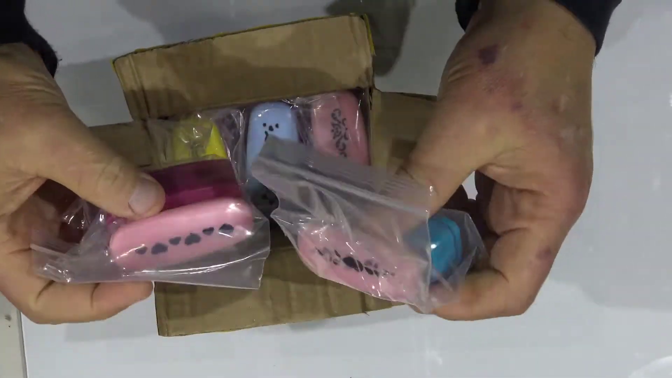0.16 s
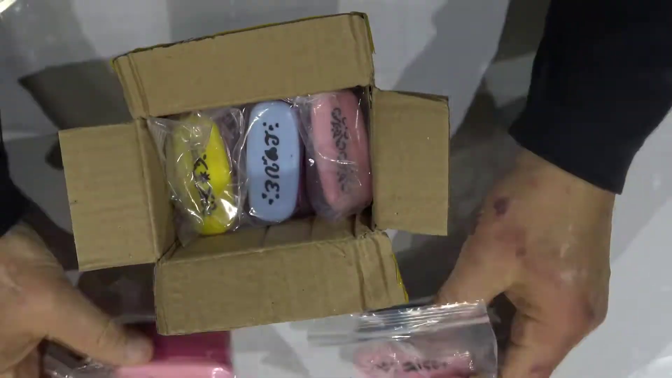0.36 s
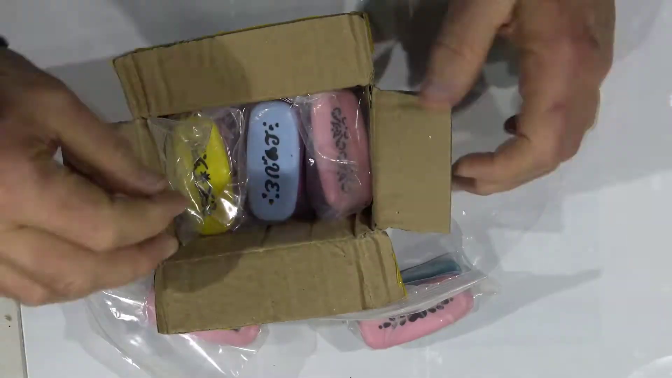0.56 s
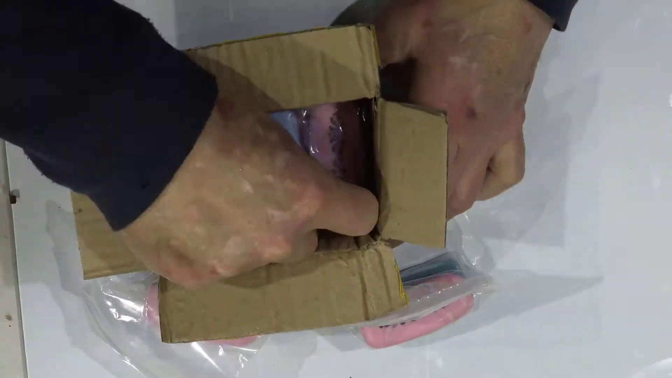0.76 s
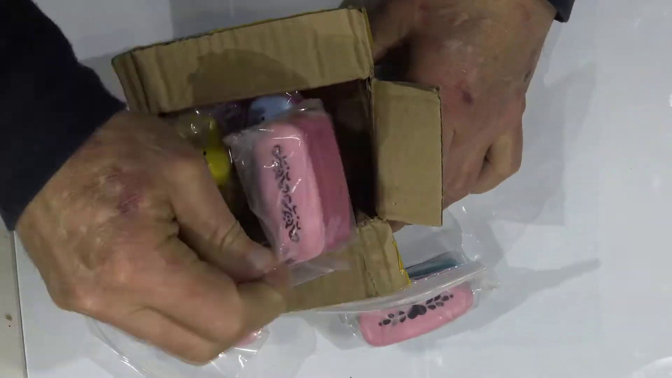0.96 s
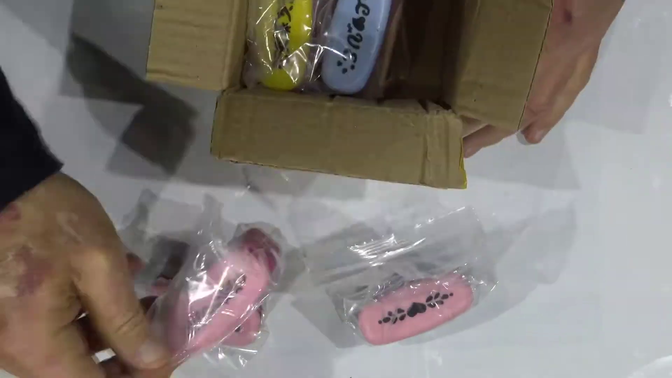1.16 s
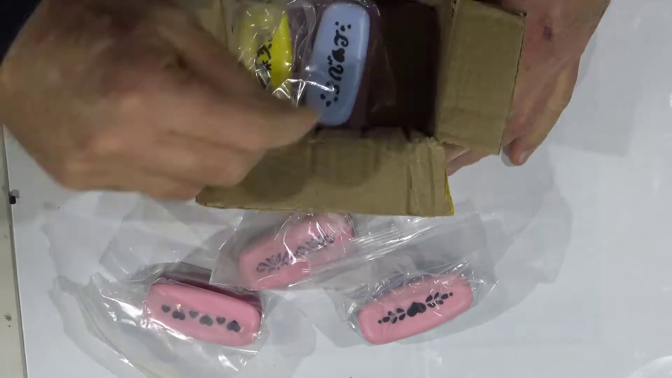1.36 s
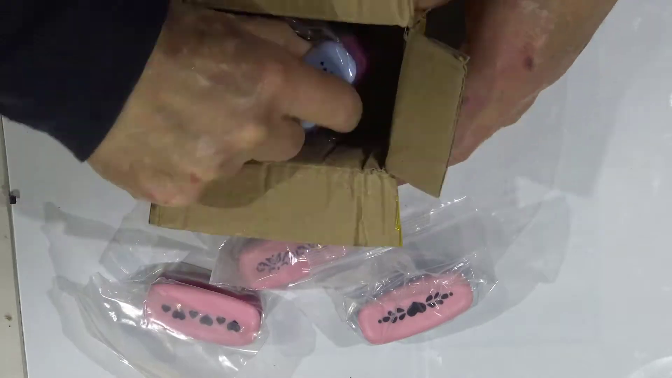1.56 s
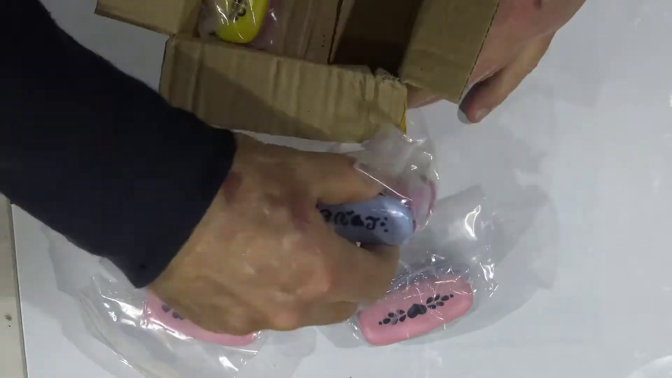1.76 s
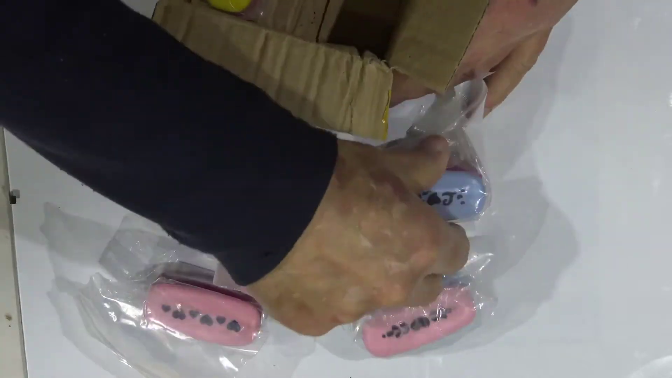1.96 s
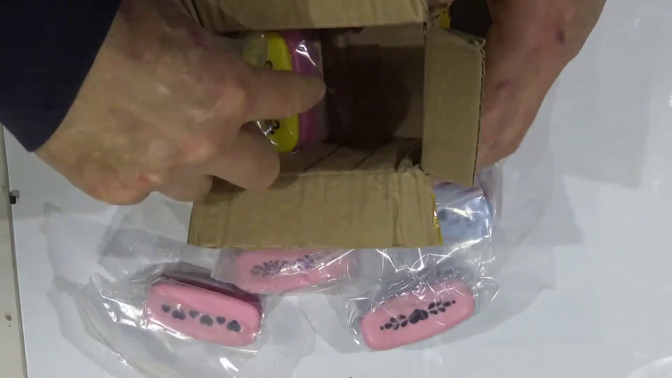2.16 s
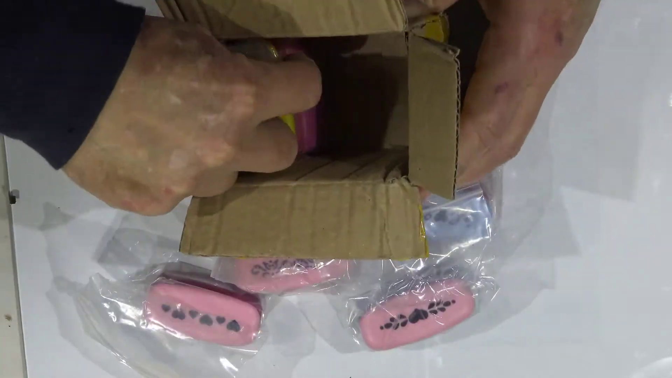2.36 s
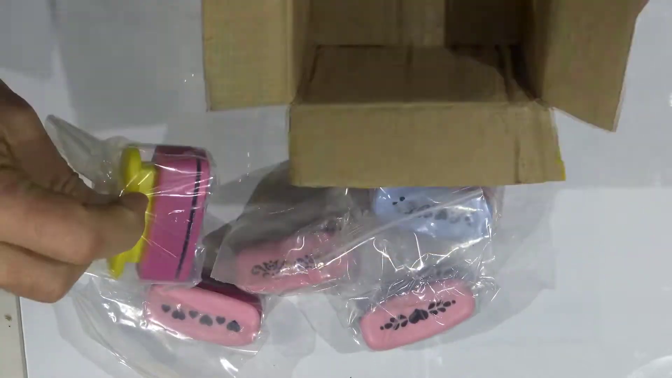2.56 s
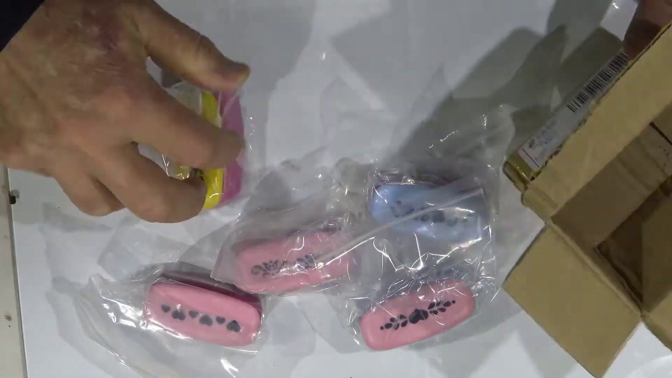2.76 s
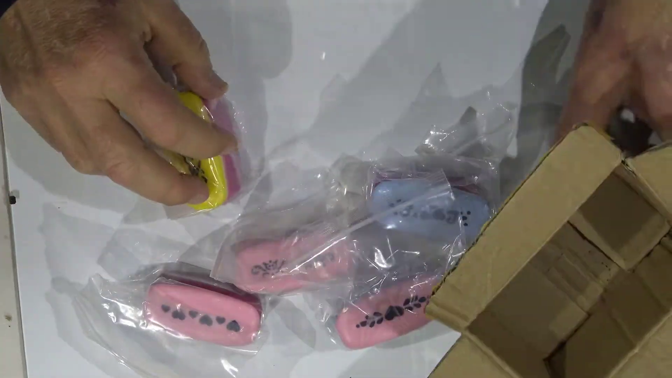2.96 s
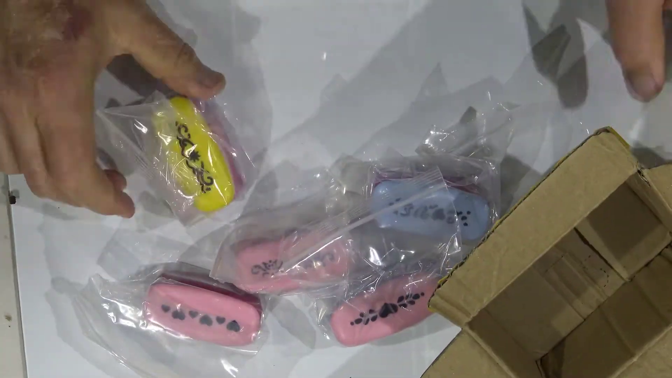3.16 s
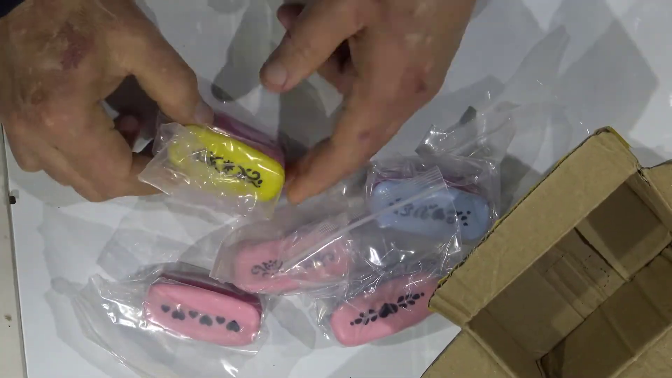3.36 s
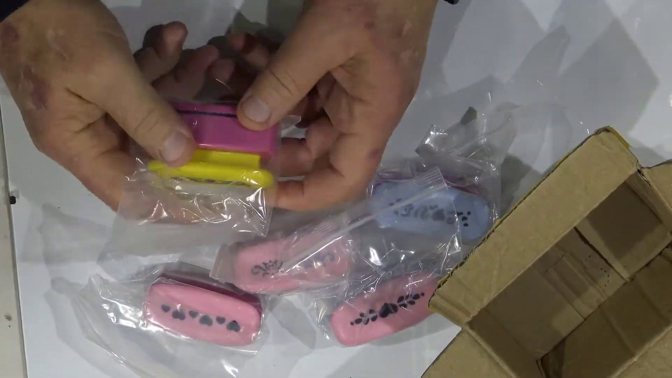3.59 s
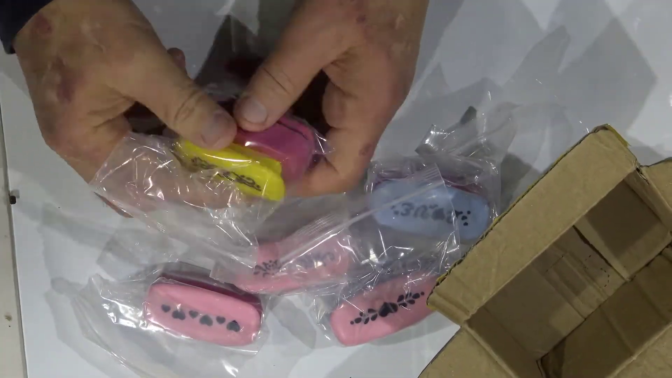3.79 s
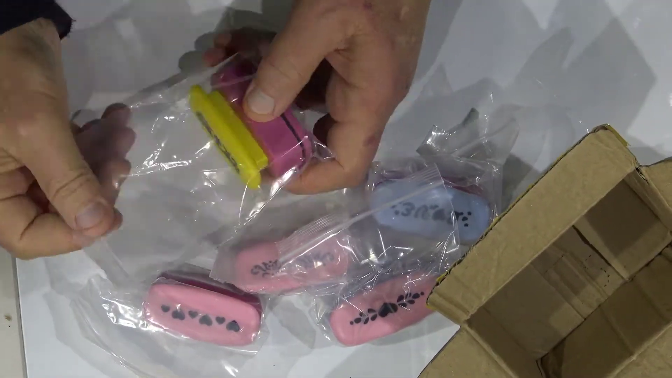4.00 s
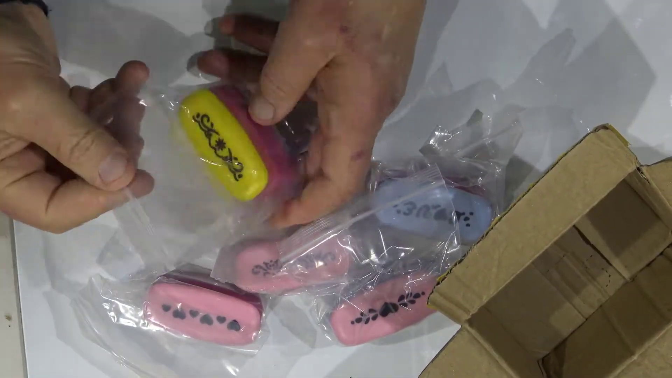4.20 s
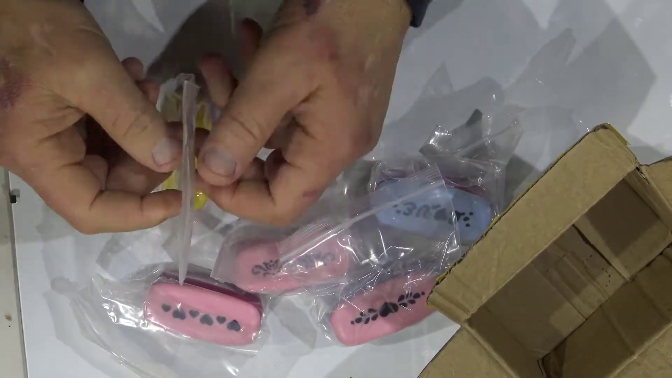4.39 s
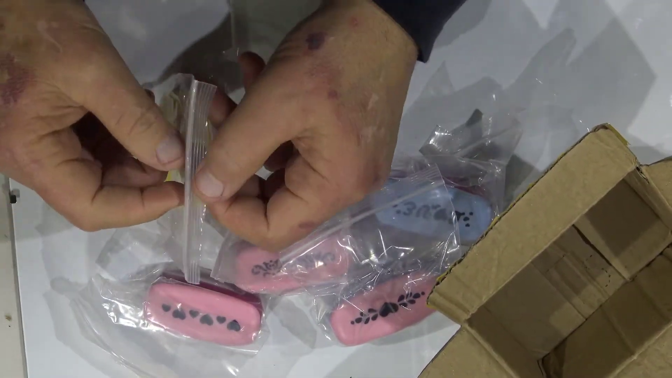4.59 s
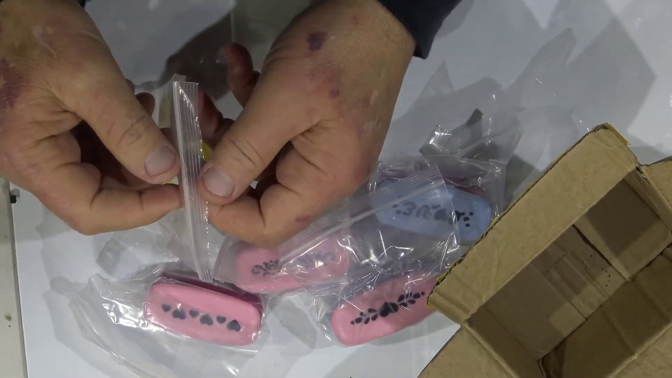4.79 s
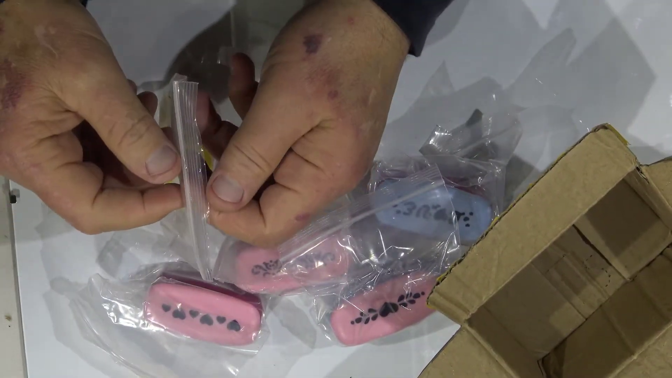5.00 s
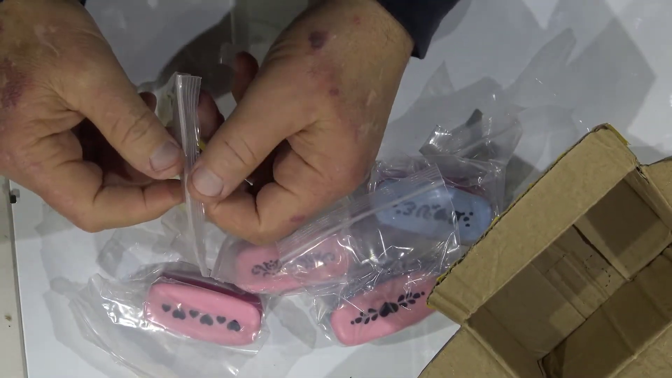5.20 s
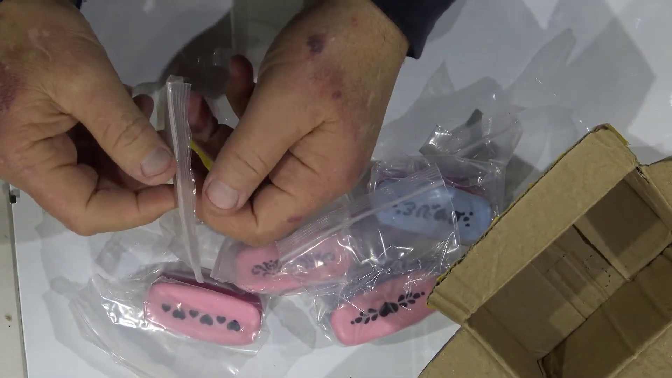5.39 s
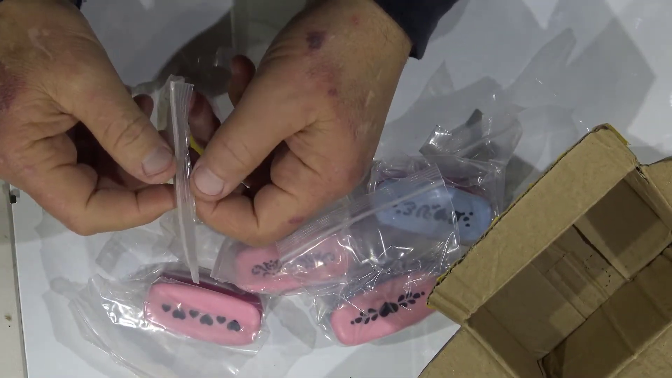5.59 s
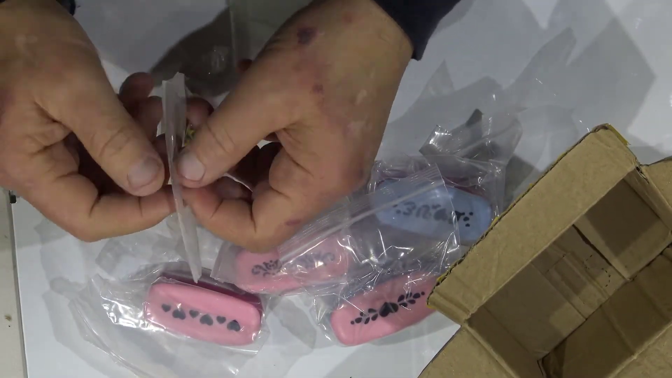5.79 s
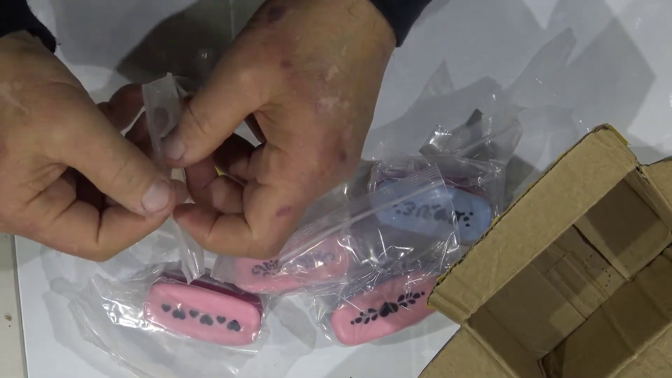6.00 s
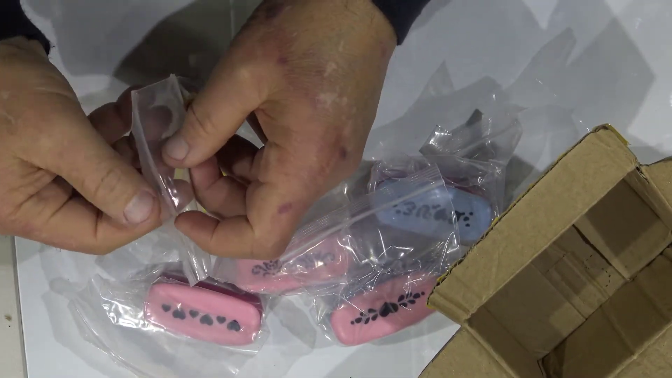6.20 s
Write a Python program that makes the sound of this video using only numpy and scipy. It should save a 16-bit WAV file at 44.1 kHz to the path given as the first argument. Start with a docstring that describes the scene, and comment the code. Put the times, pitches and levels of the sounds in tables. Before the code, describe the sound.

Thin plastic bags crinkle as small cases knock onto a table and a cardboard box bumps, then a zip seal ticks softly.

```python
"""Bagged plastic cases unpacked from a box

Thin film rustles (random crease pulses over noise) and snaps (pitched pulses with a shiver of noise) in the hands.
Cases and cardboard box knock on a table (struck modes, dense noise, a thud); taut plastic pops (ringing modes).
Then fingers work at a zip seal: clusters of ticks, each with a click.
Behind lie a faint hiss, a wavering whine and a twice-swelling tone (filtered noise, sines); a short room tail."""
import sys
import numpy as np
from scipy import signal
from scipy.fft import rfft, irfft
from scipy.io import wavfile
from scipy.ndimage import uniform_filter1d

SR = 44100
rng = np.random.default_rng(int(sys.argv[2]) if len(sys.argv) > 2 else 0)


def wav_out(sig):
    """Save sig, one row per channel (or a flat mono array), as 16-bit PCM at SR to the path in sys.argv[1]."""
    wavfile.write(sys.argv[1], SR, np.round(np.clip(np.atleast_2d(sig).T, -1, 1) * 32767).astype(np.int16))


N = 275609
MS = SR // 1000  # samples per millisecond

# "1 ms energy": rms level of the transient if squeezed into 1 ms; all source levels are ahead of the room
# room hiss contour: f/Hz, relative density/dB
HISS_CONTOUR = [(25, -18), (100, -10), (250, -4), (520, -1.5), (720, 1.5), (1500, -2), (2700, -4),
                (4500, -5), (6800, -10), (8500, -8.5), (15500, -12.5)]
# broad resonances in the hiss: f/Hz, width/Hz, gain/dB
HISS_RESONANCES = [(508.6, 15.6, 12.6), (1020, 310, 1.9), (1974, 320, 5.4), (3440, 470, 12.3),
                   (5680, 240, 11.7), (6250, 120, 13.4), (6800, 450, 10.5)]
# whine, ahead of the channel balance: f/Hz, rms level/dB
WHINE_TONES = [(357, -72.5), (452, -72.5), (527.6, -70), (644, -71.5), (888.2, -62.5), (1797, -70),
               (3525, -65.5), (6417, -76), (7074, -66.5)]
# pulls, turns and drops of a bag: start t/s, length/s, level at 2.5-8 kHz ahead of the crackle trim/dB,
# swell start to end/dB, body relative to level/dB, air relative to level/dB
BAG_STROKES = [(0, .11, -46, -2.5, -3.5, 3.5), (.218, .052, -39, -6, -6.5, 3.5),
               (0.35, .15, -43, -1, -1, 2.5), (0.412, .028, -34, 3, -13, 3.5),
               (0.587, .025, -37, -3, -9.5, -2), (0.689, .068, -33, 8, -11, -2),
               (0.771, .055, -43, 0, -8, 7), (.829, .055, -33, -8, -10.5, -0.5),
               (0.907, .075, -31, -9, -8.5, 0.5), (1.06, .06, -49, 2, -9.5, 0.5),
               (1.286, .022, -35, -3, -9.5, -0.5), (1.445, .08, -35, -2, -9.5, 2),
               (1.523, .105, -28.5, 11, -9, 2.5), (1.723, .145, -35, 2, -4.5, 3),
               (1.929, .095, -39, -2, -1.5, 1.5), (2.084, .035, -45, -4.5, -4, 6),
               (2.16, .04, -47, 4, -7, 5), (2.206, .075, -36, -5, -9, 5), (2.309, .02, -38, -8, -5, 4),
               (2.368, .09, -36, -1, -8, 2.5), (2.46, .13, -46, 0, -7, -2), (2.715, .065, -40, -2, -9, 3),
               (2.82, .018, -44, 0, -15, 7), (2.913, .04, -41, -4, -8, 1), (3.047, .03, -49, 0, 0, 7),
               (3.224, .047, -36, 0, -11.5, 2.5), (3.329, .033, -40, -1, -9, -7),
               (3.386, .06, -49, 2, -9, 11), (3.453, .023, -32, -1, -14, 6.5),
               (3.544, .155, -36, 3, -8, 4.5), (3.782, .075, -44, 4, -7.5, 7),
               (3.868, .04, -24, 3, -10.5, 3.5), (3.955, .062, -33.5, 12, -6, 4),
               (4.071, .095, -38, 1, -3.5, 0), (4.22, .125, -44.5, 5, -4, 3)]
# big creases snapping through: t/s, 1 ms energy ahead of the snap trim/dB, f/Hz, spread (floored later)/octaves
BIG_CREASES = [(.029, -25.5, 8100, 1.1), (.095, -24.5, 4650, 0.29), (0.216, -20.5, 11040, 0.71),
               (0.2416, -25, 8720, 0.53), (.268, -24.5, 7400, 0.97), (.3519, -29, 5670, 0.28),
               (0.3638, -18.5, 9100, 0.31), (0.3862, -22.5, 11820, .4), (0.4839, -25.5, 5670, 1.5),
               (0.6942, -24.5, 3640, .3), (0.8301, -19.5, 6860, 0.24), (0.8638, -22, 5700, .9),
               (0.91, -21.5, 7060, 0.17), (1.2888, -26, 6230, 0.35), (1.3851, -31.5, 3630, 0.41),
               (1.444, -19, 4455, 0.56), (1.4632, -20.5, 6406, 1.4), (1.4963, -16.5, 12100, .55),
               (1.526, -20, 4510, 1.2), (1.5938, -14.5, 5054, .2), (1.7255, -19, 11000, 0.55),
               (1.7683, -18.5, 7724, 0.43), (1.806, -19, 5227, 0.48), (1.8249, -16.5, 7900, 1.5),
               (1.9923, -22.5, 5600, .7), (2.206, -16.5, 7760, 0.83), (2.2669, -23, 9310, 0.59),
               (2.3081, -19.5, 6530, 1.6), (2.3704, -21, 12200, .8), (2.4156, -16.5, 7750, 1.23),
               (2.549, -21.5, 4200, 0.97), (2.5807, -20, 3090, 1.73), (2.6597, -21.5, 11500, 0.48),
               (2.833, -25, 10500, 0.83), (2.914, -14, 2021, 0.89), (3.0145, -32.5, 4270, 0.47),
               (3.0487, -23.5, 8900, .35), (3.1232, -25.5, 5210, 0.59), (3.256, -19.5, 9100, 1.1),
               (3.3302, -26.5, 5300, 0.36), (3.4349, -23.5, 11150, 0.99), (3.4674, -16.5, 11300, 0.66),
               (3.5203, -19.5, 8520, 0.33), (3.5514, -22.5, 6850, 1.1), (3.582, -17.5, 8000, 1.17),
               (3.6066, -17.5, 8796, 0.68), (3.628, -20.5, 12800, 0.57), (3.6638, -18, 10500, 1),
               (3.6923, -22, 8500, .7), (3.782, -22, 10600, 1.2), (3.8104, -27, 7700, .75),
               (3.847, -19.5, 7295, 0.69), (3.899, -16.5, 6450, 0.29), (3.9584, -22.5, 8190, 0.18),
               (3.9761, -26, 8095, 0.65), (4.1223, -17.5, 8300, 0.28), (4.156, -23, 7870, 1.09),
               (4.2196, -29.5, 5600, 0.65), (4.2842, -27.5, 5290, 0.8)]
# cases set on the table: t/s, body 1 ms energy/dB, then relative to body: bass/dB, clack/dB, crack/dB, thud/dB
CASE_HITS = [(.4237, -11, -9.5, 1, -10, -31), (.4623, -21, -21, -7, -20, -30),
             (1.3045, -33, 3, -22, -3, -13), (1.807, -23.5, -17, -13, 3, -25),
             (1.826, -26, -18, -24, -4, -36), (1.9578, -11, -24, -11, -5.5, -37),
             (2.714, -12, -19, -3, -7, -26), (2.776, -24.5, -20, -17, -16, -33),
             (3.307, -29, -17, -6, -19, -19), (3.348, -19.5, -27, -2.5, -4, -32)]
# cardboard box bumped and put aside: t/s, body 1 ms energy/dB, then bass/dB, clack/dB, crack/dB, thud/dB
BOX_HITS = [(.692, -27.5, -15, -21, -7, -20), (.714, -25.5, -8.5, -8, 5, -21),
            (1.444, -29.5, -23, -3, 1, -32), (2.548, -27, -19.5, 1.5, -8, -26),
            (2.581, -33.5, -34, 3, -6, -30), (2.9098, -25, -0.5, -15, 6.5, -31),
            (2.9132, -19, -4, 0, -21, -16), (2.929, -22.5, -17, -7, -2, -30)]
# bass, body, clack, crack of a knock: low f/Hz, high f/Hz
KNOCK_BANDS_HZ = [(220, 480), (480, 1500), (1500, 2700), (2500, 16000)]
# ringing of a case on the table top, nominal: f/Hz, relative level/dB, t60/s
CASE_RING = [(242, -1, 0.075), (357, 0.5, 0.053), (446, -8, 0.097), (658.5, -4.5, 0.11),
             (720, -15.5, 0.032), (727, 6, 0.023), (805, -4.5, 0.08), (975, 3, 0.063), (1130, -9, 0.13),
             (1294, -1.5, 0.085), (1380, -12, 0.11), (1500, -4.5, 0.039), (1978, 4, 0.054),
             (2060, -9, 0.13), (2300, 2, 0.075), (2490, 3, 0.047)]
# ringing of the hollow box, nominal: f/Hz, relative level/dB, t60/s
BOX_RING = [(205, -2, 0.04), (262, -14, 0.056), (340, -8, 0.056), (653, -4.5, 0.091), (715, -15, 0.042),
            (966, -25, 0.049), (1059, 4.5, 0.057), (1190, 5, 0.031), (1590, -1, 0.035), (1843, -17, 0.11),
            (2304, 2, 0.097), (2700, -24, 0.1)]
# pops of taut plastic: t/s, 1 ms energy/dB
PLASTIC_POPS = [(0.585, -36), (0.602, -14)]
# ringing of a pop, nominal: f/Hz, relative level/dB, t60/s
POP_RING = [(3290, 5, 0.016), (3310, 0, 0.016), (2900, -6, 0.02), (3520, -5, 0.014), (6840, 8, 0.011),
            (7520, 2, 0.013), (8200, -1, 0.019), (8900, -4, 0.02), (13400, -12, 0.0048)]
# squeezes of the zip seal: peak t/s, tick level ahead of the crackle trim/dB, 1/e time each side/s,
# click 1 ms energy ahead of the snap trim/dB, click f/Hz
SEAL_SQUEEZES = [(4.435, -56, 0.0087, -35.5, 5550), (4.6166, -47, 0.0062, -28.5, 9400),
                 (4.707, -41.5, .014, -31, 7060), (5.107, -40, .011, -24, 10400),
                 (5.203, -51, .005, -41, 9000), (5.2458, -47.5, 0.0086, -32.5, 6200),
                 (5.368, -49, .008, -49, 7000), (5.4626, -44.5, 0.0058, -28, 8630),
                 (5.6846, -37, 0.0066, -20.5, 8800), (5.8093, -50, 0.019, -30, 7080),
                 (5.892, -45.5, .014, -24.5, 14000), (6.0615, -52.5, .01, -33, 7200),
                 (6.13, -52, .005, -48, 5000), (6.2312, -46, 0.0061, -27, 8480)]
# swells of the faint tone: peak t/s, 1/e half length/s, peak level/dB
TONE_SWELLS = [(5.22, 0.12, -62.5), (5.994, 0.16, -57)]


def undb(db):
    """Decibels to amplitude gain."""
    return 10 ** (np.asarray(db) / 20)


def level(x, rms_db):
    """Scale to an rms level."""
    return x * undb(rms_db) / np.sqrt(np.mean(x ** 2))


def blow(x, energy_db):
    """Scale a transient to the energy of one millisecond at the given rms level."""
    return x * undb(energy_db) / np.sqrt(np.sum(x ** 2) / MS)


def fade(t60_s, size):
    """Exponential decay, 60 dB in t60_s."""
    return np.exp(-np.log(1000) * np.arange(size) / SR / t60_s)


def burst(t60_s, size):
    """Decaying noise of unit energy: many modes too dense to tell apart."""
    x = rng.standard_normal(size) * fade(t60_s, size)
    return x / np.linalg.norm(x)


def ring(modes, scatter, size):
    """Struck modes of unit energy; each contact point weights, flips and detunes them a little differently."""
    t = np.arange(size) / SR
    chance = rng.standard_normal((len(modes), 3))
    x = np.zeros(size)
    for (hz, db, t60_s), (weight_db, detune, sign) in zip(modes, chance):
        tone = np.sin(2 * np.pi * hz * (1 + scatter * detune) * t)
        x += np.sign(sign) * undb(db + weight_db) * fade(t60_s, size) * tone
    return x / np.linalg.norm(x)


def band(x, lo_hz, hi_hz, order=3):
    """Causal Butterworth band-pass."""
    return signal.sosfilt(signal.butter(order, [lo_hz, hi_hz], "band", fs=SR, output="sos"), x)


def click(spectrum_db):
    """Minimum-phase pulse with the given spectrum, by folding the cepstrum."""
    cepstrum = irfft(np.log(undb(spectrum_db)))
    half = len(cepstrum) // 2
    cepstrum[1:half] *= 2
    cepstrum[half + 1:] = 0
    return irfft(np.exp(rfft(cepstrum)))


def add(out, start_s, x):
    """Mix a sound in at a time."""
    i = max(int(start_s * SR), 0)
    out[i:i + len(x)] += x[:max(N - i, 0)]


def background(hiss_db=-52.0, side_gain=0.16, waver=0.41, balance_db=.5):
    """Steady hiss with a few broad resonances, plus thin tones that waver in level and phase."""
    hz = np.fft.rfftfreq(N, 1 / SR) + 1
    t = np.arange(N) / SR
    points_hz, points_db = np.transpose(HISS_CONTOUR)
    spectrum_db = np.interp(np.log(hz), np.log(points_hz), points_db)
    for f, width_hz, gain_db in HISS_RESONANCES:
        spectrum_db = spectrum_db + gain_db / (1 + (2 * (hz - f) / width_hz) ** 2)
    mid, side = (level(irfft(rfft(rng.standard_normal(N)) * undb(spectrum_db), N), hiss_db) for _ in range(2))
    for f, tone_db in WHINE_TONES:
        drift = waver * np.interp(t, np.linspace(0, t[-1], 50), rng.standard_normal(50))
        mid = mid + level((1 + drift) * np.sin(2 * np.pi * f * t + 2 * drift), tone_db)
    left = (mid + side_gain * side) * undb(balance_db)
    right = (mid - side_gain * side) * undb(-balance_db)
    return np.array([left, right])


def handling():
    """Level, body and air of the film in dB: each stroke rises, holds while it swells or eases, and dies away."""
    held_db, held_body_db, held_air_db = -56, -5, 2  # film stirring between strokes
    settle_s, settle_release_s = 4.4, .09  # hands come to rest on the seal
    attack_s, release_s = .006, .013  # film takes up the pull, then settles
    t = np.arange(N) / SR
    power = undb(held_db) ** 2 * np.exp(-2 * np.maximum(t - settle_s, 0) / settle_release_s) + 1e-12
    # body and air are averaged by power
    body, air = power * held_body_db, power * held_air_db
    for s, length_s, db, swell_db, body_db, air_db in BAG_STROKES:
        before_s, after_s = np.minimum(t - s, 0), np.maximum(t - s - length_s, 0)
        edges = np.exp(before_s / attack_s - after_s / release_s)
        progress = np.clip((t - s) / length_s, 0, 1)
        stroke = (edges * undb(db + swell_db * (progress - .5))) ** 2
        power = power + stroke
        body = body + stroke * body_db
        air = air + stroke * air_db
    return 10 * np.log10(power), body / power, air / power


def crackle(level_db, body_db, air_db, base_per_s=750, size_db=6.5, own_db=7, kinship=0.72, slide=0.2, trim_db=-4.0):
    """Tiny creases give way at random, faster under more force, each with its own colour, over sliding-film hiss."""
    density_per_s = base_per_s * (1 + undb(level_db + 33))
    at = np.flatnonzero(rng.random(N) < density_per_s / SR)
    chance = rng.standard_normal((len(at), 15))
    size = undb(size_db * chance[:, 0]) * np.sign(chance[:, 1])
    colour_db = own_db * chance[:, 2]
    edges_hz = [280, 600, 1000, 1600, 2400, 3200, 4100, 5300, 6700, 8200, 10300, 13000, 16500]
    shares_db = [body_db - 17.5, body_db - 9, body_db - 2.0, body_db - 1.5,
                 -6.5, -6, -7, -7.5,
                 0.36 * air_db - 10.5, 1.17 * air_db - 9.0, air_db - 12.5, air_db - 8.0]
    out, kinship = 0, np.clip(kinship, 0, 1)
    for k, share_db in enumerate(shares_db):
        # a crease strong in one band tends to be strong in the next
        colour_db = kinship * colour_db + np.sqrt(1 - kinship ** 2) * own_db * chance[:, 3 + k]
        x = slide * density_per_s / base_per_s * rng.standard_normal(N)
        x[at] += size * undb(colour_db)
        x = band(x, edges_hz[k], edges_hz[k + 1], order=2)
        # the hand feeds in energy steadily, however unevenly the creases spend it
        running_rms = np.sqrt(uniform_filter1d(x ** 2, size=1300) + 1e-12)
        out = out + (-1) ** k * x / running_rms * undb(level_db + share_db + trim_db)
    return out


def bags(level_db, body_db, air_db, taut_db=-6, taut_s=0.011):
    """Bags dragged and turned in the hands; film goes taut and quiet just before a big crease gives way."""
    t = np.arange(N) / SR
    snap_s = np.append(np.sort(np.array(BIG_CREASES)[:, 0]), np.inf)
    wait_s = snap_s[np.searchsorted(snap_s, t)] - t
    return crackle(level_db, body_db, air_db) * undb(taut_db * np.exp(-wait_s / taut_s))


def small_creases(level_db, count=90, crowding=.7, typical_db=-28, growth=0.72, scatter_db=2,
                  pitch_hz=7300, pitch_octaves=0.51, spread_octaves=0.44, ceiling_db=-22):
    """Rows like BIG_CREASES: lesser creases snap at random, more often and harder the more the film is worked."""
    chance = rng.standard_normal((count, 3))
    work = np.cumsum(undb(crowding * level_db))
    at = np.searchsorted(work, work[-1] * (np.arange(count) + rng.random(count)) / count)
    db = typical_db + growth * (level_db[at] - np.median(level_db[at])) + scatter_db * chance[:, 0]
    hz = pitch_hz * 2 ** (pitch_octaves * chance[:, 1])
    spread = spread_octaves * 2 ** (.5 * chance[:, 2])
    return list(zip(at / SR, np.minimum(db, ceiling_db), hz, spread))


def snaps(creases, skirt_db=-26, sharp=1.0, flutter=0.63, flutter_t60_s=0.023, trim_db=-2.0):
    """A crease flips: one sharp pulse pitched by its size, then the sheet around it shivers."""
    out = np.zeros(N)
    hz = np.fft.rfftfreq(512, 1 / SR) + 1
    for s, db, pitch_hz, spread in creases:
        hump = np.exp(-.5 * (np.log2(hz / pitch_hz) / (sharp * max(spread, .2))) ** 2)
        # so small a patch of film radiates little bass
        radiation = hz ** 2 / (hz ** 2 + 700 ** 2)
        spectrum_db = 20 * np.log10((hump + undb(skirt_db)) * radiation + 1e-4)
        pulse = blow(click(spectrum_db), db + trim_db)
        shiver = flutter * burst(flutter_t60_s, size=1500)
        shiver[0] = 1
        add(out, s, np.convolve(pulse, shiver))
    return out


def knocks(hits, modes, contact, dense, dense_t60_s, crack_t60_s, punch=1.9, graze_db=-24):
    """An edge grazes first; then full contact rings the body and cracks, with a faint thud of the table."""
    out = np.zeros(N)
    for s, db, bass_db, clack_db, crack_db, thud_db in hits:
        # modes crowd together above the few low ones
        crowd = blow(band(burst(dense_t60_s, size=9000), 710, 2600, order=2), 0) / np.sqrt(MS)
        body = ring(modes, 0.0044, size=9000) + dense * crowd
        body[0] += punch
        crack = burst(crack_t60_s, size=9000)
        crack[0] += contact
        # neighbouring bands alternate in sign so that they join in phase
        parts = [body, -body, body, -crack]
        for x, (lo_hz, hi_hz), rel_db in zip(parts, KNOCK_BANDS_HZ, [bass_db, 0, clack_db, crack_db]):
            # duller towards the top
            part = band(band(x, lo_hz, hi_hz, order=2), 200, 4400, order=1)
            add(out, s, blow(part, db + rel_db))
        thud = band(burst(0.15, size=9000), 25, 210, order=1)
        add(out, s, blow(thud, db + thud_db))
        graze = band(burst(0.016, size=1000), 650, 4000, order=2)
        add(out, s - .003, blow(graze, db + graze_db))
    return out


def pops():
    """Taut plastic pops: its modes ring briefly over a little decaying noise."""
    out = np.zeros(N)
    for s, db in PLASTIC_POPS:
        x = ring(POP_RING, 0.006, size=2000) + 0.12 * burst(0.032, size=2000)
        add(out, s, blow(band(x, 1500, 11000, order=1), db))
    return out


def seal_ticks(body_db=-7, air_db=4):
    """Each squeeze of the zip seal lets off a short cluster of ticks as its force rises and falls."""
    t = np.arange(N) / SR
    force = 1e-6 + sum(undb(db) * np.exp(-np.abs(t - s) / decay_s) for s, db, decay_s, _, _ in SEAL_SQUEEZES)
    return crackle(20 * np.log10(force), body_db, air_db, base_per_s=990, trim_db=-0.5)


def seal_clicks(spread_octaves=0.81):
    """Rows like BIG_CREASES: the seal clicks at the peak of each squeeze."""
    return [(s, db, hz, spread_octaves) for s, _, _, db, hz in SEAL_SQUEEZES]


def faint_tone(centre_hz=950, width_hz=40):
    """A thin unsteady tone, narrow-band noise, swells twice, barely above the hiss."""
    t = np.arange(N) / SR
    swell = sum(undb(db) * np.exp(-((t - s) / half_s) ** 2) for s, half_s, db in TONE_SWELLS)
    noise = band(rng.standard_normal(N), centre_hz - width_hz / 2, centre_hz + width_hz / 2, order=2)
    return swell * level(noise, 0)


def scatter_tail(near, near_t60_s, far, far_t60_s):
    """Near scattering from 1 ms on, wall reflections from 3 ms on."""
    near_part = near * np.pad(burst(near_t60_s, size=16000), (MS, 2 * MS))
    far_part = far * np.pad(burst(far_t60_s, size=16000), (3 * MS, 0))
    return near_part + far_part


def room(x, near=0.39, near_t60_s=0.032, far=0.044, far_t60_s=0.2, side_gain=.32, side_top_hz=4000):
    """Table, box and hands scatter sound at once; walls add a short tail, slightly different left and right."""
    mid, side = (scatter_tail(near, near_t60_s, far, far_t60_s) for _ in range(2))
    # long waves bend around such small things and scatter less
    mid = band(mid, 1600, 18000, order=1)
    mid[0] = 1  # direct sound
    side = side_gain * band(side, 20, side_top_hz, order=1)
    return np.array([signal.fftconvolve(x, mid + sign * side)[:N] for sign in (1, -1)])


def scene(balance_db=-0.04):
    """Handling close to the microphone, in the room, over the background."""
    level_db, body_db, air_db = handling()
    creases = BIG_CREASES + seal_clicks() + small_creases(level_db)
    film = bags(level_db, body_db, air_db) + snaps(creases) + pops() + seal_ticks()
    cases = knocks(CASE_HITS, CASE_RING, contact=0.54, dense=0.9, dense_t60_s=0.065, crack_t60_s=0.088)
    box = knocks(BOX_HITS, BOX_RING, contact=0.12, dense=0.95, dense_t60_s=0.11, crack_t60_s=0.058)
    near_sound = room(film + cases + box) * undb([[balance_db], [-balance_db]])
    return near_sound + background() + faint_tone()


def record(dry, ceiling=.6, top_hz=16000):
    """Round the tallest peaks with tanh, then cut the top with an elliptic low-pass."""
    rounded = ceiling * np.tanh(dry / ceiling)
    return signal.sosfilt(signal.ellip(8, .2, 70, top_hz, fs=SR, output="sos"), rounded)


dry = scene()
out = record(dry)
wav_out(out)
```